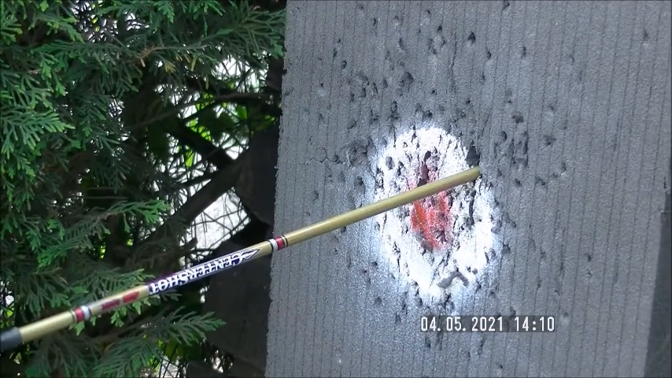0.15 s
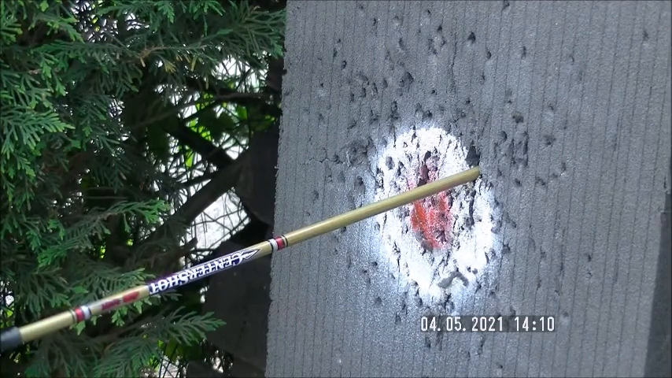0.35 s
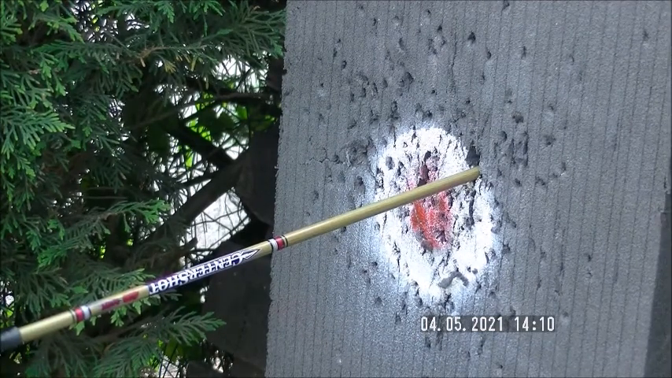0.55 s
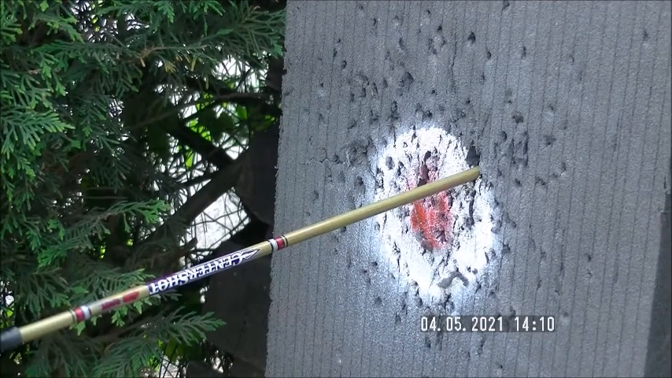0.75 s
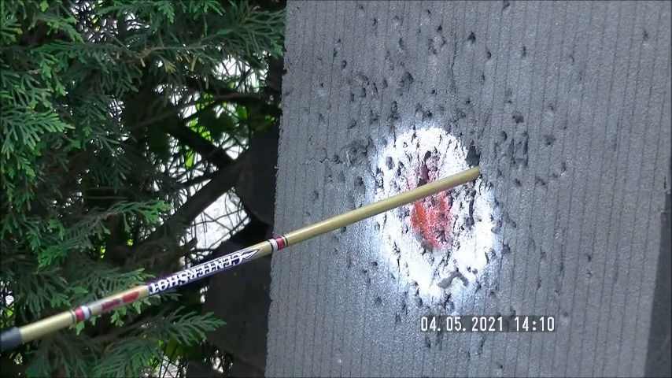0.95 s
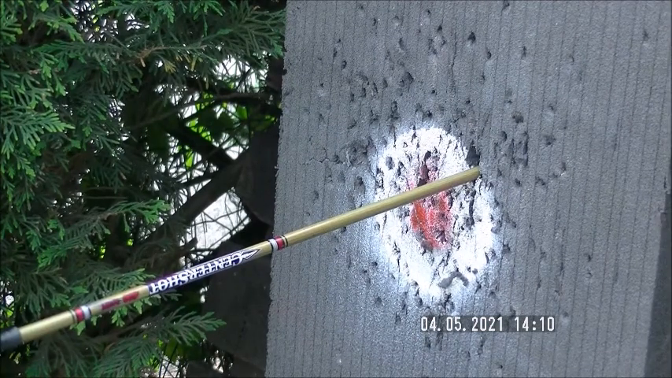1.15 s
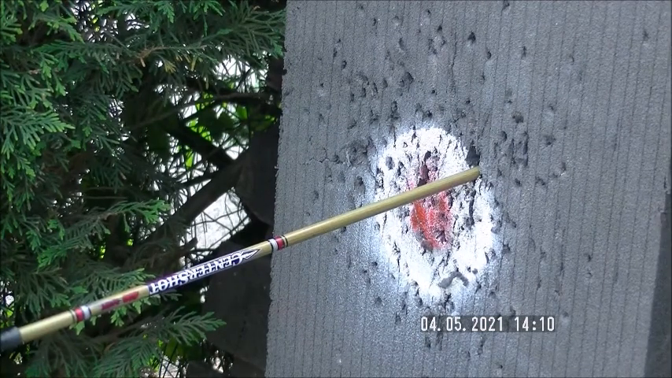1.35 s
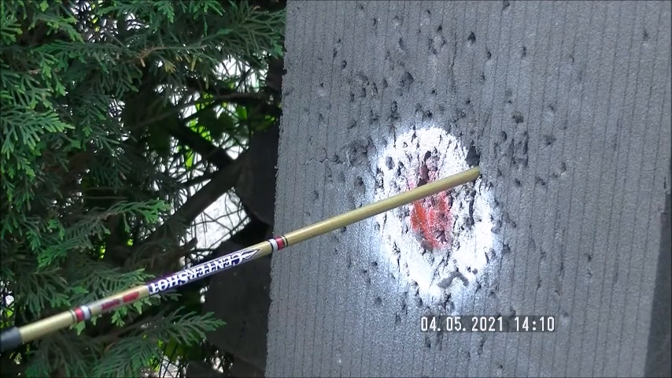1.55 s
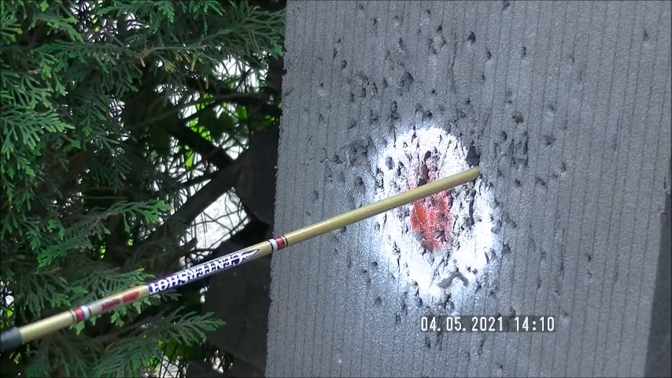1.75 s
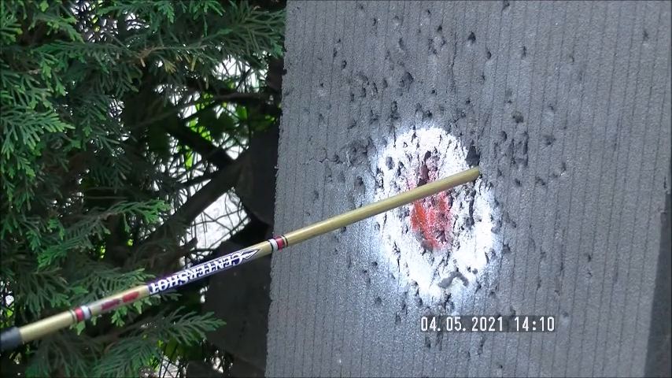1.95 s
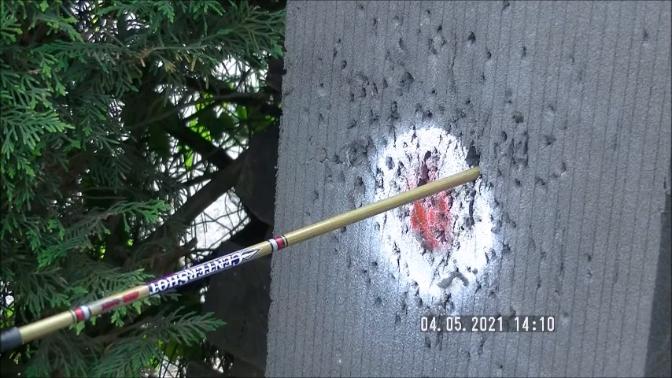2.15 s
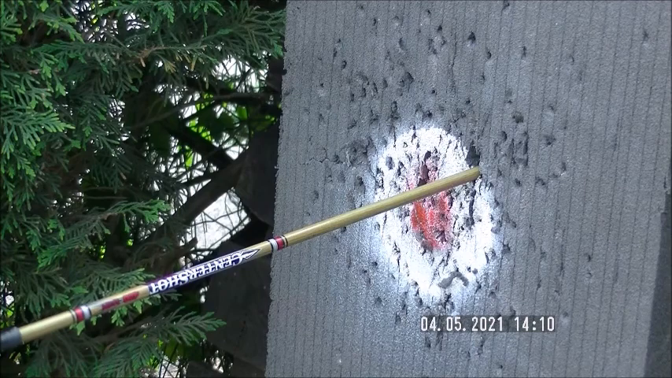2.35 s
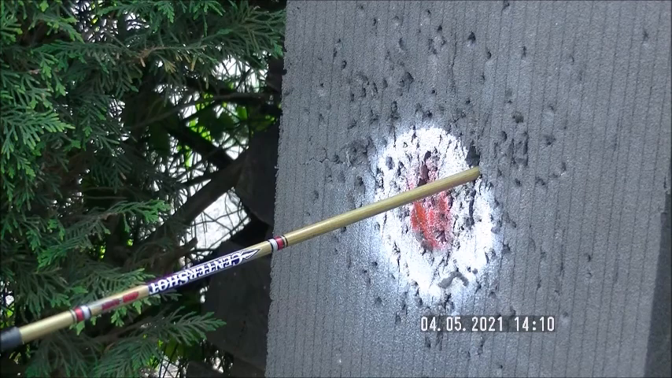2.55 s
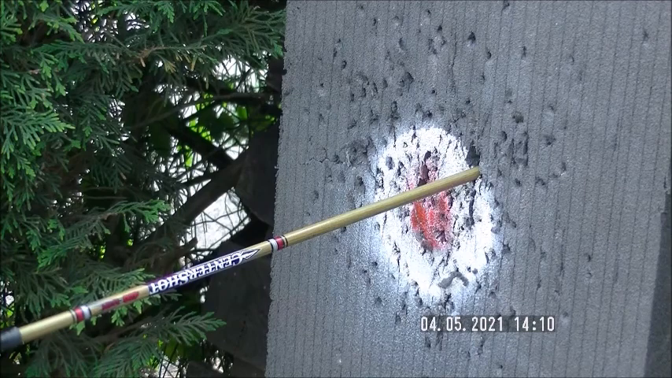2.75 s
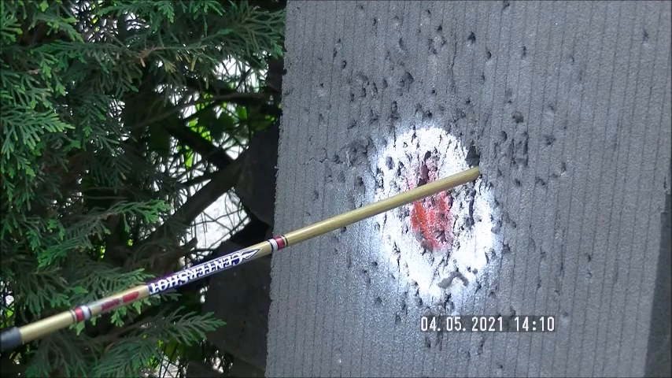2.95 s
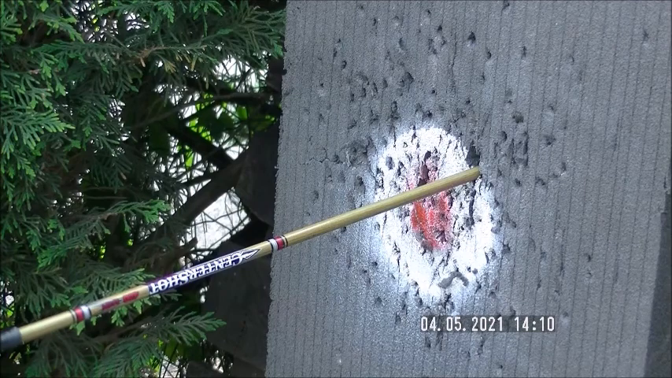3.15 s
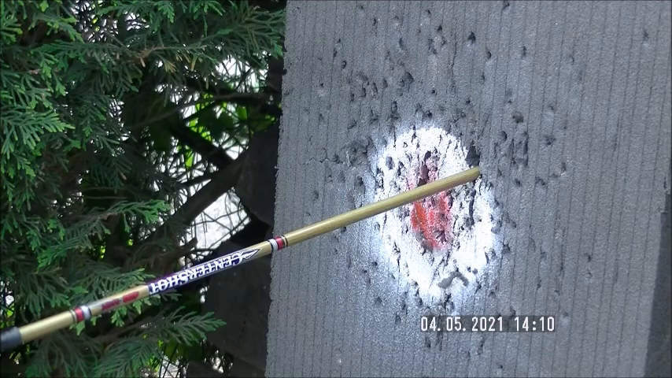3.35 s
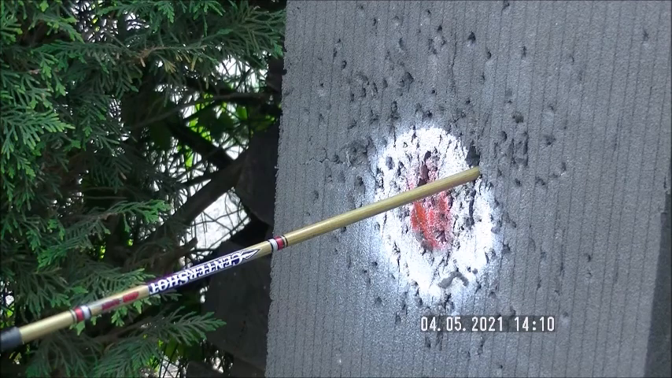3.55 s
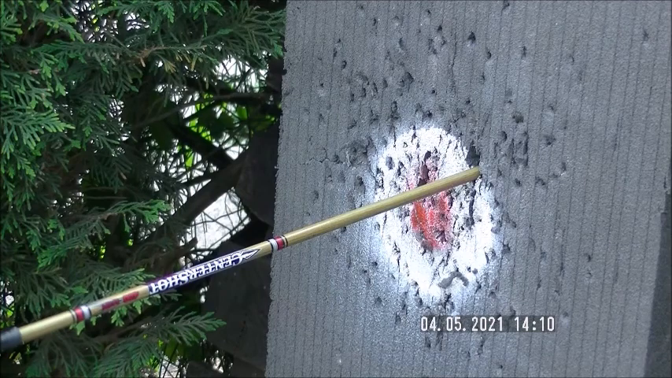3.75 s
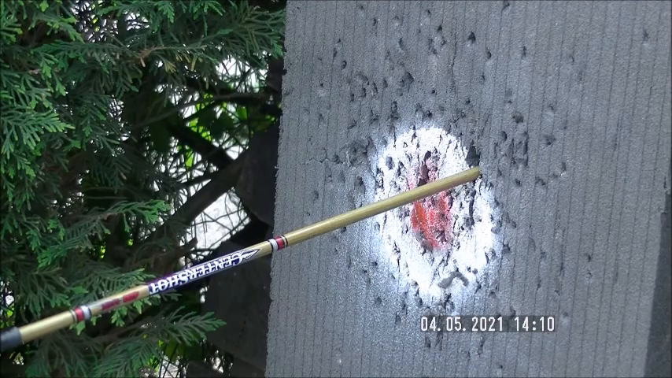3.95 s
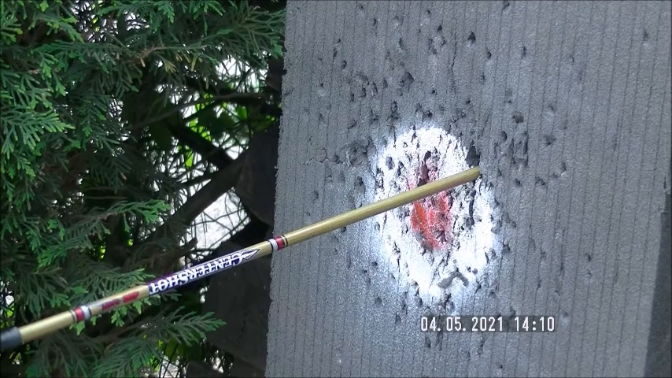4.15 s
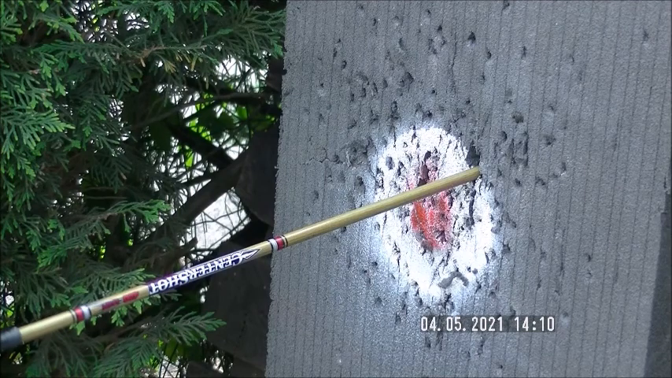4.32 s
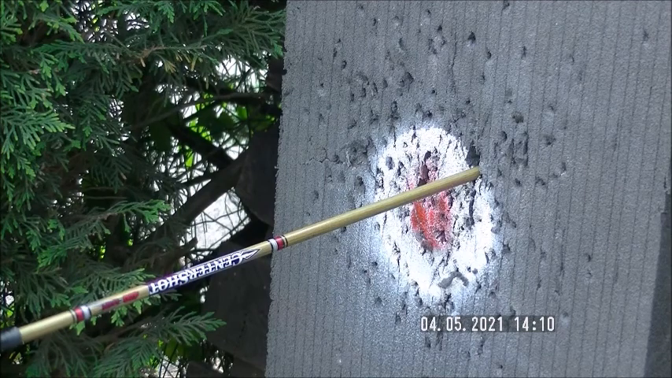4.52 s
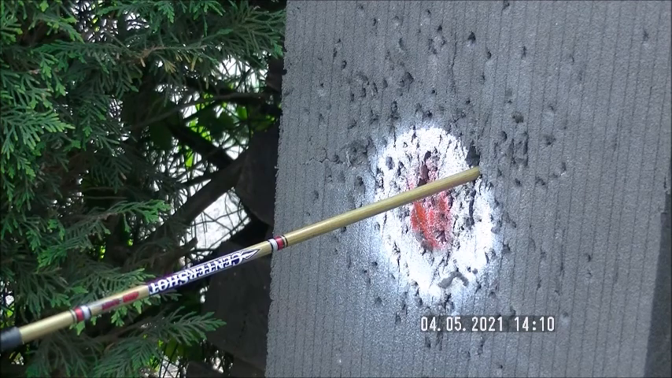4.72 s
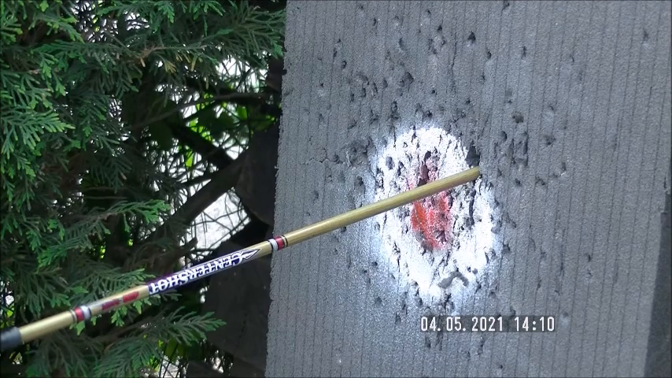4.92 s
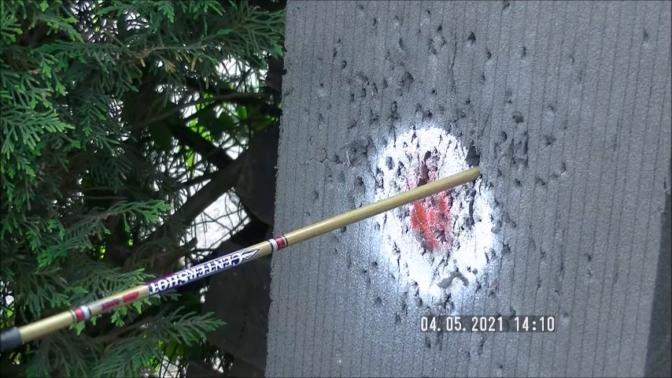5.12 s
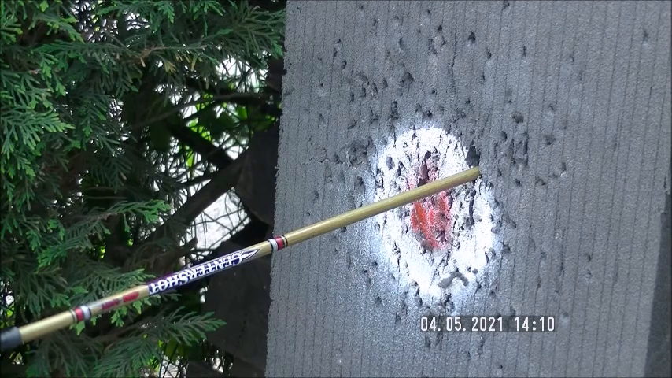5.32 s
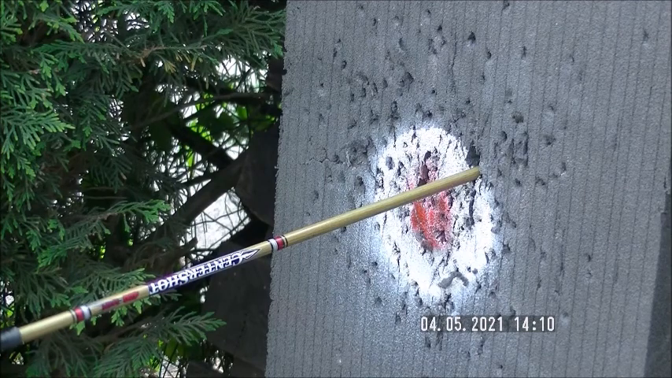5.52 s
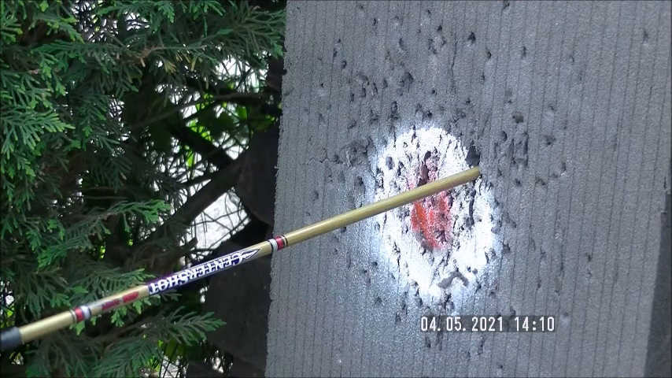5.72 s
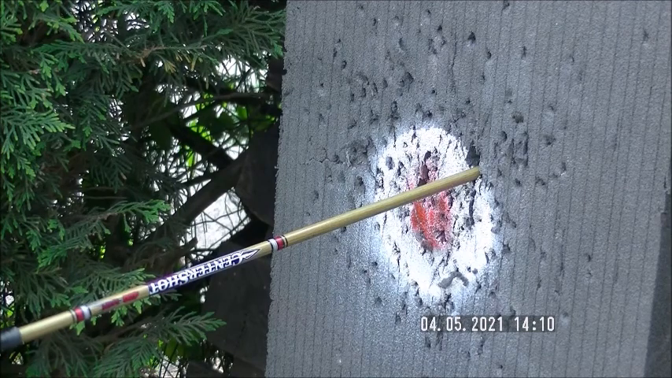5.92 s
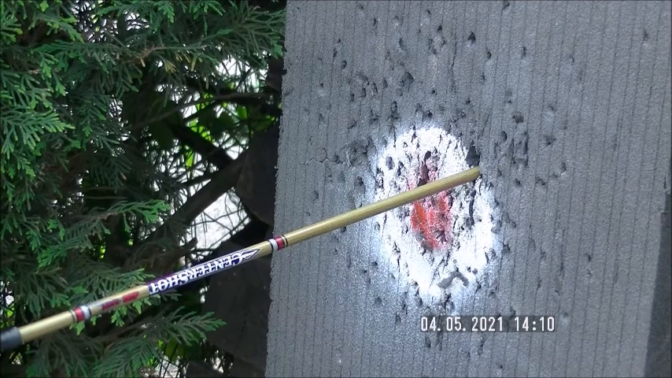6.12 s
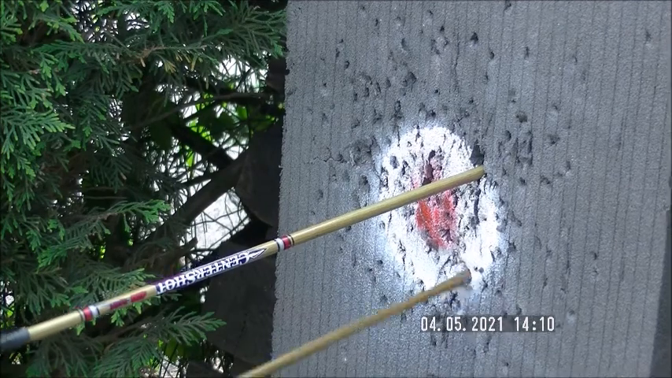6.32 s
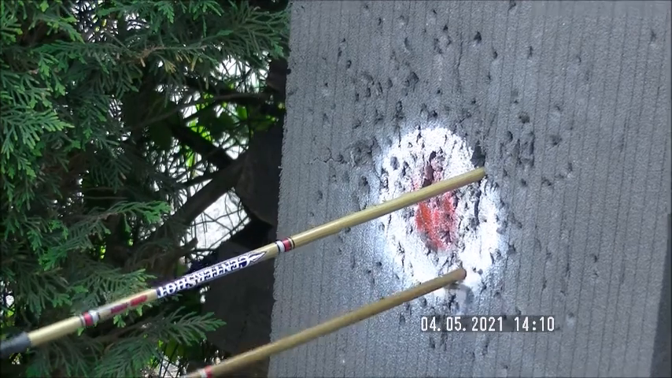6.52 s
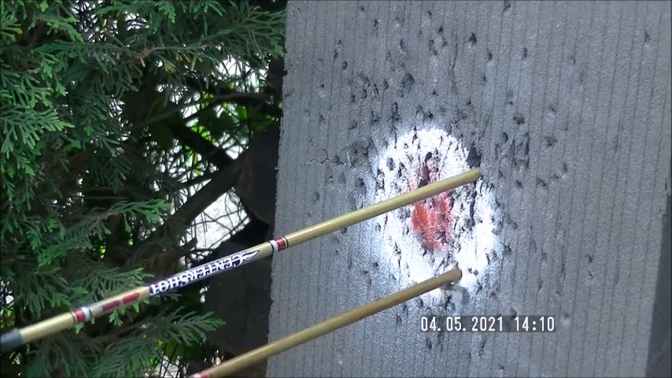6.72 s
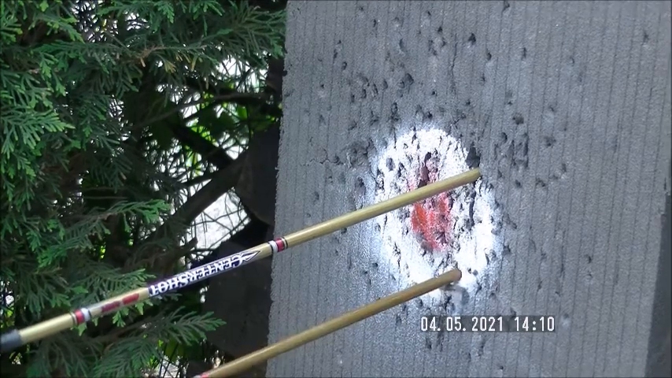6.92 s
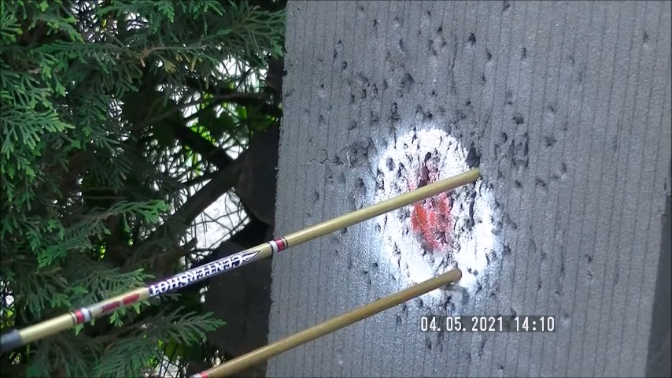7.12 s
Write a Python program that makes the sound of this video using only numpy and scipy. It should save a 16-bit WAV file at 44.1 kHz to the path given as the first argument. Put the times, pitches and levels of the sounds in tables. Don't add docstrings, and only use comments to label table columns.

```python
import sys
import numpy as np
from scipy import signal
from scipy.fft import rfft, irfft, next_fast_len
from scipy.io import wavfile
from scipy.ndimage import uniform_filter1d

SR = 44100
rng = np.random.default_rng(int(sys.argv[2]) if len(sys.argv) > 2 else 0)


def makeup_ratio(level_db):
    decades = np.asarray(level_db, float) / 20
    return 10 ** decades


def transcribe(u):
    v = np.clip(np.atleast_2d(u).T, -1, 1)
    q = np.round(v * 32767).astype(np.int16)
    wavfile.write(sys.argv[1], SR, q)


N = 316197
T = np.arange(N) / SR
FFT_SIZE = next_fast_len(N)
HZ = np.fft.rfftfreq(FFT_SIZE, 1 / SR)
LEFT_RIGHT = np.array([[1], [-1]])

HIT_S, HIT_DB = 6.3531, -2.9
# pitch_hz, level_db, t60_s
BLOCK_MODES = [(540, -16, .03), (800, -12, .025), (1250, 0, .009), (1650, -11, .03), (1990, -9, .025),
               (2400, -15, .035)]
# pitch_hz, level_db, t60_s
SHAFT_MODES = [(2960, -8, .02), (3850, -4, .01), (4130, 5.5, .008), (4700, -4, .014), (6800, -6, .004),
               (8600, -6, .0045), (11800, -8, .004), (14500, -16, .005)]
# start_hz, rest_hz, fall_s, level_db, t60_s
FACE_THUD = (800, 172, .007, -4.5, .074)
# frequency_hz, density_db (per Hz)
TEAR_COLOUR = [(60, -55), (250, -5), (660, 6), (1950, -5.5), (3250, -2), (4300, -9), (6000, -14),
               (8640, -16.5), (11500, -26), (16000, -32)]
# level_db, t60_s
TEAR_CRACK = [(-20, .01)]
# level_db, t60_s
TEAR_CRUNCH = [(-15, 0.05), (-24.5, 0.25)]
SWAY_DB, SWAY_RISE_S, SWAY_T60_S = -52.5, .03, .75
# delay_s, spread_s, level_db
REFLECTORS = [(.012, 0.019, -13), (0.034, 0.017, -17.5), (.052, 0.043, -15.5), (.08, 0.048, -23),
              (0.111, 0.14, -38), (.185, .06, -30), (0.256, 0.011, -33), (0.313, .04, -36)]

# start_s, level_db, t60_s
BOW_SLAPS = [
    (6.154, -50, 0.13),
    (6.166, -37.5, 0.14),
    (6.179, -31.5, 0.078),
    (6.205, -43, 0.097),
    (6.231, -40, 0.081),
]
# frequency_hz, density_db (per Hz)
BOW_COLOUR = [(88, -48), (150, -8), (334, -20), (457, -11.5), (716, -10.5), (2360, -2.5), (3040, -7.5),
              (3920, -1.5), (5910, -12), (8730, -11), (10200, -23), (16000, -36)]
# frequency_hz, density_db (per Hz)
FLIGHT_COLOUR = [(59, -54), (100, -22), (558, -22), (1200, -18), (3320, -7), (4980, 2.5), (5650, -11.5),
                 (7290, -4), (13800, -15.5), (16000, -25)]
LOOSE_S, GUST_DB, GUST_T60_S = 6.168, -47, .3
ARROW_M_S, NEAREST_M = 55, .5
HISS_DB, GROWTH = -41, .8

# last_stroke_s, level_db
CRICKET_CHIRPS = [(0.059, -49.4), (0.3425, -47.7), (0.6393, -48.5), (0.8759, -46.7), (1.1262, -44.2),
                  (1.3858, -43.9), (1.6394, -44.8), (1.8827, -45.0), (2.1273, -43.5), (2.3926, -44.6),
                  (2.64, -47.0), (2.8969, -47.3), (3.1471, -47.4), (3.3863, -48.3), (3.6218, -44.7),
                  (3.8616, -44.5), (4.1326, -43.1), (4.3844, -43.9), (4.6246, -43.6), (4.8776, -43.8),
                  (5.1259, -46.3), (5.3642, -45.4), (5.62, -46.0), (5.884, -48.4), (6.1277, -49.6),
                  (6.35, -47), (6.5648, -47.9), (6.781, -45.0), (7.011, -44.9), (7.249, -45)]
# lead_ms (before the row above, or the crest), level_db, rise_share, drop_hz
CHIRP_STROKES = [
    (12, 0, 1, 0),
    (35.4, -.5, .85, 15),
    (33.9, -3.7, .55, 45),
    (22.3, -10, .3, 220),
]
STROKE_JITTER_MS, STROKE_JITTER_DB = .6, .7
# from_crest_ms, swell_share, pitch_hz
WING_STROKE = [(-12, 0, 5160), (-7, .58, 5130), (-2, .85, 5095), (1.5, 1, 5050), (3.2, .95, 5000),
               (5.5, .22, 4880), (7.3, .5, 4830), (9.5, 0, 4750)]

# start_s, stretch, pitch_factor, level_db, end_lean_db
SPARROW_CHIRPS = [(2.795, 1.01, 1.01, -47.5, 4), (2.945, 0.99, 0.99, -58, 5), (4.662, 1.05, .98, -48, -7),
                  (5.398, 1.01, 1.03, -46, 1.5), (6.205, 1.01, .99, -42.5, 5)]
# from_start_s, pitch_hz, level_db
SPARROW_HIGH = [(0, 2550, -14), (.022, 3150, -1), (.04, 3800, -6), (.056, 4060, 0), (.072, 4200, -1.5),
                (.09, 4060, -4), (.105, 3800, -10), (.125, 3300, -24)]
# from_start_s, pitch_hz, level_db
SPARROW_LOW = [(.008, 2400, -11), (.035, 3250, 2), (.05, 3450, -1), (.07, 3600, -7), (.086, 3700, -6),
               (.097, 3450, 3), (.112, 3050, 4), (.128, 2750, -16)]
SPARROW_ECHO_S, SPARROW_ECHO_DB = .026, -6
# start_s, level_db
TIT_CALLS = [(3.33, -64), (3.39, -61.5), (4.165, -57), (4.201, -61.5), (4.25, -57.5), (4.461, -57),
             (4.49, -64), (4.74, -55.5), (5.04, -57), (5.361, -54), (5.65, -50.5), (5.928, -48.5)]
# from_start_s, pitch_hz, level_db
TIT_ARCH = [(0, 4240, -8), (.011, 5200, 1.5), (.022, 5900, -13), (.035, 5400, -6), (.046, 4700, 2.5),
            (.07, 3900, -7), (.092, 3400, -6), (.112, 4060, 1.5), (.134, 5080, -6)]
# from_start_s, pitch_hz, level_db
TIT_HELD = [(0, 4340, -12), (.014, 4510, -2.5), (.04, 4650, -10), (.055, 4530, -3), (.073, 4380, -14)]
# start_s, length_s, pitch_hz, level_db
THRUSH_NOTES = [(1.13, .046, 4360, -68), (1.43, .074, 1890, -63), (1.62, .042, 3010, -66),
                (1.75, .044, 2215, -61.5), (2.14, .032, 3880, -58), (2.29, .15, 3390, -61),
                (2.3, .19, 2300, -64), (2.5, .15, 2810, -64), (2.5, .2, 2410, -60), (2.55, .031, 4140, -60),
                (2.78, .14, 2415, -59.5), (3.42, .05, 2240, -64), (3.49, .27, 2380, -63.5),
                (3.86, .1, 2270, -64), (3.87, .06, 2070, -65), (3.96, .05, 2030, -60),
                (4.08, .08, 2270, -59), (6.85, .28, 2310, -61), (6.92, .2, 2100, -66),
                (6.87, .07, 4370, -63), (7.08, .063, 1740, -62)]
# start_s, length_s, start_hz,
# end_hz, level_db
THRUSH_SLURS = [(.925, .016, 2800, 2250, -57), (1.53, .06, 3500, 3100, -59), (1.87, .15, 2050, 1900, -58.5),
                (1.98, .1, 1490, 1690, -60), (2.13, .09, 1950, 1730, -59), (2.15, .096, 2750, 2230, -58),
                (2.17, .034, 2950, 2400, -58), (2.43, .098, 2300, 2900, -56), (2.68, .05, 3400, 2460, -56),
                (2.785, .04, 3950, 3550, -50), (4.14, .06, 2350, 2700, -63), (7.05, .06, 4200, 3900, -63)]
# start_s, length_s, pitch_hz, level_db
DOVE_COO = [
    (1.6, .4, 509, -64.5),
]

# start_s, peak_db, t60_s, treble_db
SNAPS = [(0.4185, -51, 0.12, -18), (0.688, -50, 0.17, -22), (0.7249, -44.5, 0.24, -34),
         (1.938, -38, 0.16, -24), (1.9547, -48, 0.12, -25), (3.8214, -49.5, 0.11, -23),
         (3.869, -47, 0.1, -23), (4.4325, -37.5, 0.12, -41), (4.4846, -47.5, 0.12, -24),
         (5.026, -43, 0.29, -22)]
SNAP_HZ = 3530

# frequency_hz, density_db (per Hz)
AIR_COLOUR = [(15, -63), (25, -31), (70, -21), (256, -2.5), (317, -7), (416, -0.5), (545, -1), (818, -1),
              (2110, -12.5), (2990, -13), (4030, -13.5), (4870, -12), (5730, -19.5), (7710, -21),
              (14800, -26.5), (16000, -28)]
# frequency_hz, side_minus_mid_db
AIR_WIDTH = [(60, 1.5), (110, -3.5), (200, -0.5), (380, -3.5), (700, -10), (1290, -7), (2380, -4),
             (4400, -9.5), (8120, -7), (15000, -59)]
# time_s, level_db
TRAFFIC_SWELL = [(0, -58.5), (.74, -59), (1.86, -57.5), (3.4, -58.7), (5.19, -57), (6.35, -56.5),
                 (7.17, -57.8)]
# time_s, level_db
CHORUS_SWELL = [(0, -63.5), (.3, -66.5), (1.86, -63.5), (2.85, -60), (3.73, -66.5), (4.63, -58),
                (5.19, -63.5), (5.6, -60.5), (7.17, -63)]
# time_s, level_db
ENGINE_SWELL = [(0, -79.5), (4.2, -81), (4.6, -75.5), (5.8, -70.5), (6.1, -82), (7.2, -78)]


def impact():
    t = np.arange(SR // 4) / SR
    hit = np.zeros(N)
    add(hit, HIT_S, modes(BLOCK_MODES, t) + modes(SHAFT_MODES, t) * np.tanh((t / .0008) ** 2))
    bite = np.clip((T - HIT_S) / .0008, 0, 1)
    tear = sum(makeup_ratio(db) * fade(HIT_S, t60) for db, t60 in TEAR_CRACK + TEAR_CRUNCH)
    hit += noise(TEAR_COLOUR) * bite * tear
    hit = signal.sosfilt(signal.butter(4, 260, "high", fs=SR, output="sos"), hit)
    add(hit, HIT_S, thud(t))

    rise = np.clip((T - HIT_S) / SWAY_RISE_S, 0, 1) ** 2
    sway = noise([(20, -12), (60, -7), (130, 1), (200, -35)])
    sway = sway * makeup_ratio(SWAY_DB) * fade(HIT_S, SWAY_T60_S) * rise
    return makeup_ratio(HIT_DB) * (hit * makeup_ratio(-.45 * LEFT_RIGHT) + reflections(hit)) + sway * makeup_ratio(2.5 * LEFT_RIGHT)


def thud(t):
    start_hz, rest_hz, fall_s, db, t60 = FACE_THUD
    pitch = rest_hz + (start_hz - rest_hz) * np.exp(-t / fall_s)
    return makeup_ratio(db - 60 * t / t60) * np.sin(2 * np.pi * np.cumsum(pitch) / SR) * np.tanh((t / .011) ** 2)


def reflections(hit):
    walls = np.zeros((2, SR // 2))
    for delay, spread, db in REFLECTORS:
        i, k = int(delay * SR), int(spread * SR)
        mid, side = rng.standard_normal((2, k)) * np.linspace(1, 0, k) / np.sqrt(k)
        walls[:, i:i + k] += makeup_ratio(db) * (mid + 0.6 * side * LEFT_RIGHT)
    dull = signal.sosfilt(signal.butter(1, [170, 6000], "band", fs=SR, output="sos"), hit)
    return signal.oaconvolve(dull[None], walls, axes=1)[:, :N]


def shot():
    bow = noise(BOW_COLOUR) * sum(makeup_ratio(db) * fade(s, t60) for s, db, t60 in BOW_SLAPS)
    metres = np.hypot(ARROW_M_S * (HIT_S - T), NEAREST_M)
    hiss = makeup_ratio(HISS_DB) / metres ** GROWTH * (T > LOOSE_S) * (T < HIT_S)
    gust = makeup_ratio(GUST_DB) * fade(LOOSE_S, GUST_T60_S)
    flight = noise(FLIGHT_COLOUR) * (gust + hiss)
    return place(bow, -.5, -4, .3, .005) + place(flight, .3, -12, .1, .003)


def cricket():
    out = np.zeros(N)
    lead_ms, stroke_db, rises, drops = np.transpose(CHIRP_STROKES)
    for s, db in CRICKET_CHIRPS:
        late, loud = rng.standard_normal((2, 4)) * (rises < 1)
        leads = (np.cumsum(lead_ms) + STROKE_JITTER_MS * late) / 1000
        levels = db + stroke_db + STROKE_JITTER_DB * loud + 1.63
        for lead, level, rise, drop_hz in zip(leads, levels, rises, drops):
            add(out, s - lead, makeup_ratio(level) * wing_stroke(rise, drop_hz))
    return place(out, -0.4, -14.5, 0.28, 0.0045, 5.2)


def wing_stroke(rise, drop_hz):
    ms, share, hz = np.transpose(WING_STROKE)
    ms = np.where(ms < 0, rise * ms, ms)
    t = np.arange(-12, 10, 1000 / SR)
    pitch = np.interp(t, ms, hz) - drop_hz
    return np.interp(t, ms, share) * np.sin(2 * np.pi * np.cumsum(pitch) / SR)


def birds():
    sparrow = sing([SPARROW_HIGH, SPARROW_LOW], SPARROW_CHIRPS, 4, 300, .018)
    sparrow = sparrow + makeup_ratio(SPARROW_ECHO_DB) * np.roll(sparrow, int(SPARROW_ECHO_S * SR))
    tit = sing([TIT_ARCH, TIT_HELD], [(s, 1, 1, db, 0) for s, db in TIT_CALLS], 3.5, 260, .012)
    held = [(s, length, hz, hz, db) for s, length, hz, db in THRUSH_NOTES + DOVE_COO]
    thrush_and_dove = whistle(held + THRUSH_SLURS, 4, 220, .009, .5)
    near = makeup_ratio(-2.5) * place(sparrow, -.6, -2.5, .45, .006, 4)
    middle = makeup_ratio(-6) * place(tit, .3, 4.5, .45, .008, 6)
    far = makeup_ratio(-3) * place(thrush_and_dove, -.4, 2, .5, .008, 4)
    return near + middle + far


def sing(voices, calls, flutter_db, flutter_hz, waver):
    out, shake = np.zeros(N), 1 + waver * walk(70)
    for start, stretch, factor, call_db, lean_db in calls:
        for s, hz, db in map(np.transpose, voices):
            t = np.arange(s[0], s[-1], 1 / (SR * stretch))
            pitch = uniform_filter1d(np.interp(t, s, hz), size=300) * factor
            pitch = pitch * shake[int(start * SR):][:len(t)]
            loud = makeup_ratio(call_db + np.interp(t, s, db) + lean_db * (t / s[-1] - .5))
            tone = signal.windows.tukey(len(t), .1) * np.sin(2 * np.pi * np.cumsum(pitch) / SR)
            add(out, start + s[0] * stretch, loud * tone)
    return out * makeup_ratio(flutter_db * walk(flutter_hz))


def whistle(notes, flutter_db, flutter_hz, waver, edge):
    out, shake = np.zeros(N), 1 + waver * walk(70)
    for s, length, start_hz, end_hz, db in notes:
        u = np.linspace(0, 1, int(length * SR))
        pitch = (start_hz + (end_hz - start_hz) * u) * shake[int(s * SR):][:len(u)]
        add(out, s, makeup_ratio(db) * np.sin(np.pi * u) ** edge * np.sin(2 * np.pi * np.cumsum(pitch) / SR))
    return out * makeup_ratio(flutter_db * walk(flutter_hz))


def snaps():
    out, t = np.zeros(N), T[:16384]
    for s, db, t60, treble_db in SNAPS:
        colour = [(300, -25), (1200, -8), (SNAP_HZ, 0), (6500, treble_db / 2), (16000, treble_db * 2)]
        decay = makeup_ratio(-60 * t / .01) + 0.25 * makeup_ratio(-60 * t / t60)
        add(out, s, makeup_ratio(db - 2) * noise(colour, size=len(t)) * decay)
    return place(out, -.3, -2, 0.27, 0.0028)


def air():
    traffic_db, chorus_db = level_curve(TRAFFIC_SWELL), level_curve(CHORUS_SWELL)
    mid, side = rfft(rng.standard_normal((2, FFT_SIZE))) * shape(AIR_COLOUR)
    pair = mid + side * shape(AIR_WIDTH) * LEFT_RIGHT
    out, octave, rest = 0, np.log2(HZ + 1e-9), np.ones(len(HZ))
    for hz in 20 * 2 ** np.arange(0, 8.1, .5):
        window = np.cos(np.pi * np.clip(octave - np.log2(hz), -.5, .5)) ** 2
        swell = traffic_db - traffic_db[0] if hz < 1800 else 0.6 * (chorus_db - chorus_db[0])
        out = out + irfft(pair * window, FFT_SIZE)[:, :N] * makeup_ratio(swell + 0.66 * walk(5.4))
        rest = rest - window
    out = out + irfft(pair * rest, FFT_SIZE)[:, :N]
    engine = noise([(70, -68), (88, -12.5), (102, 5), (125, -22)]) * makeup_ratio(level_curve(ENGINE_SWELL))
    whine = noise([(7700, -36), (7790, -1), (7830, 0), (7920, -28)]) * makeup_ratio(-81)
    return unit(out) * makeup_ratio(-55.3 - .25 * LEFT_RIGHT) + engine + whine


def place(x, pan_db, wet_db, t60, gap_s, clumps=0.):
    t = np.arange(SR // 2) / SR
    decay = makeup_ratio(-60 * t / t60 + clumps * walk(150)[:len(t)])
    mid, side = rng.standard_normal((2, len(t))) * (t > gap_s) * decay
    tail = mid + 0.39 * side * LEFT_RIGHT
    tail *= makeup_ratio(wet_db) / np.sqrt(np.sum(tail ** 2) / 2)
    return x * makeup_ratio(pan_db * LEFT_RIGHT / 2) + signal.oaconvolve(x[None], tail, axes=1)[:, :N]


def modes(table, t):
    return sum(makeup_ratio(db - 60 * t / t60) * np.sin(2 * np.pi * hz * t) for hz, db, t60 in table)


def noise(points, size=FFT_SIZE):
    spectrum = rfft(rng.standard_normal(size)) * shape(points, np.fft.rfftfreq(size, 1 / SR))
    return unit(irfft(spectrum, size)[:N])


def shape(points, grid=HZ):
    hz, db = np.transpose(points)
    return makeup_ratio(np.interp(np.log(grid + 1), np.log(hz), db))


def unit(x):
    return x / np.sqrt(np.mean(x ** 2))


def level_curve(rows):
    s, db = np.transpose(rows)
    return np.interp(T, s, db)


def fade(s, t60):
    out = np.zeros(N)
    add(out, s, makeup_ratio(-60 * T[:SR] / max(t60, .002)))
    return out


def walk(rate):
    k = int(SR / rate)
    held = np.repeat(rng.standard_normal(N // k + 1), k)
    return 1.3 * uniform_filter1d(uniform_filter1d(held, k), k)[:N]


def add(out, s, x):
    i = int(s * SR)
    x = x[max(-i, 0):max(N - i, 0)]
    out[max(i, 0):max(i, 0) + len(x)] += x


def scene():
    return impact() + shot() + cricket() + birds() + snaps() + air()


def roll_off(x):
    return signal.sosfilt(signal.butter(12, 15770, fs=SR, output="sos"), x)


def record(dry):
    mix = np.clip(dry, -.98, .98)
    return roll_off(mix)


dry = scene()
out = record(dry)
transcribe(out)
```